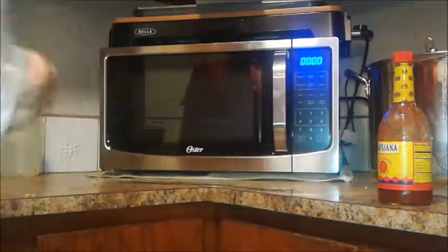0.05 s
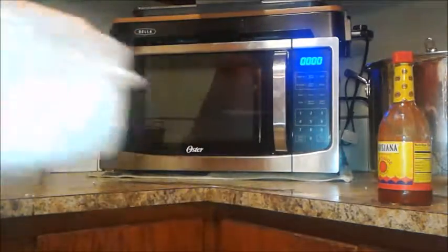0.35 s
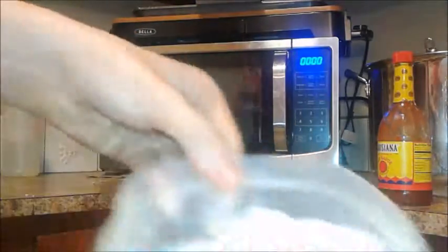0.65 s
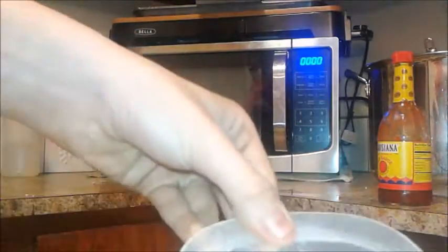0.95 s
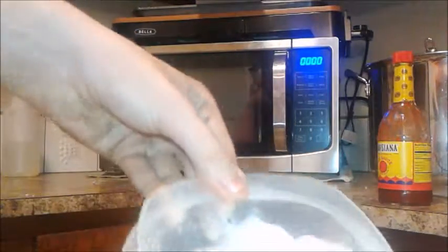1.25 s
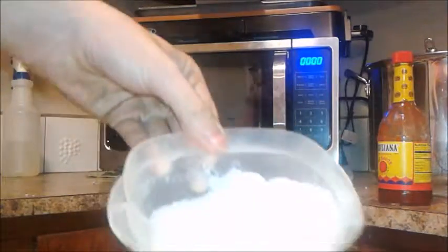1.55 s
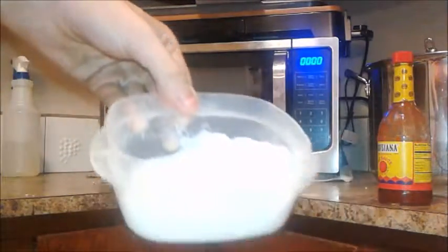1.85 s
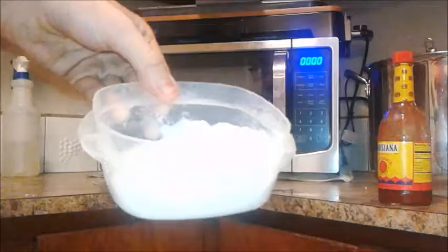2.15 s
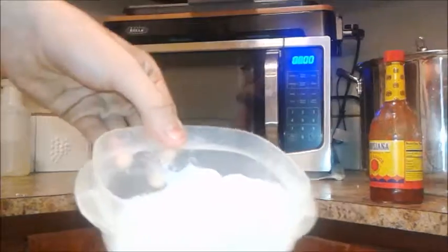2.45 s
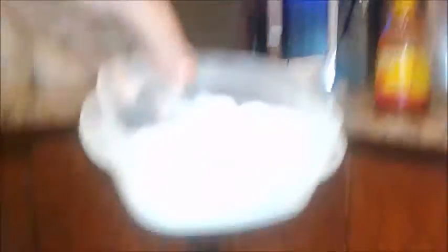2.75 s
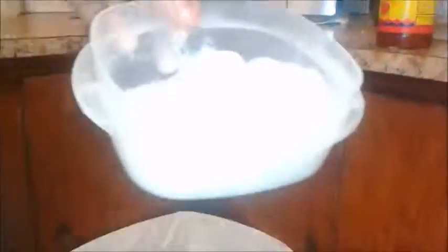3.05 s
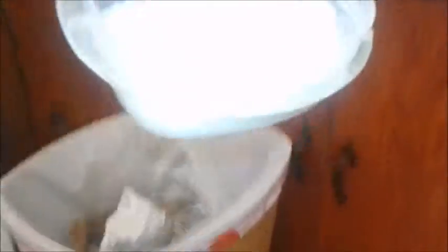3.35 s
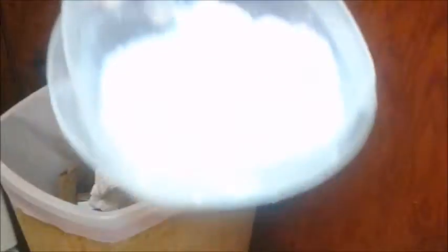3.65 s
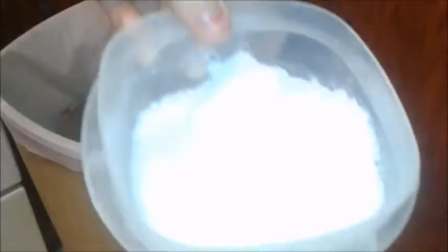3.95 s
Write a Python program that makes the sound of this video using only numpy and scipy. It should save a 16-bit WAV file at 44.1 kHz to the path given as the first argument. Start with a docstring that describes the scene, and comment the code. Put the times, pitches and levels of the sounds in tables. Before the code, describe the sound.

A plastic tub knocks sharply and irregularly over a bin in a quiet kitchen.

```python
"""Powder tub knocked over a bin

A plastic tub of powder is carried across a quiet kitchen and knocked about over a bin, up close.
Each knock is a sharp crack, a clack of the walls and a short hollow thump; the hard room answers
with a bright tail. An appliance hums underneath, and fingers tick, creak and rub on the plastic."""
import sys
import numpy as np
from scipy import signal
from scipy.fft import rfft, irfft
from scipy.io import wavfile

SR = 44100
rng = np.random.default_rng(int(sys.argv[2]) if len(sys.argv) > 2 else 0)


def waveform_to_disk(signal):
    """Save audio, clipped to [-1, 1], as 16-bit WAV at the path in sys.argv[1]."""
    frames = np.transpose(np.atleast_2d(signal))
    scaled = np.clip(frames, -1, 1) * 32767
    samples = np.round(scaled).astype(np.int16)
    wavfile.write(sys.argv[1], SR, samples)


N = 176400


def amp(db):
    """Decibels to gain."""
    return 10 ** (np.asarray(db) / 20)


def unit(x):
    """Scales to rms 1."""
    return x / np.sqrt(np.mean(x ** 2) + 1e-20)


def read(points, hz, column=1):
    """Reads one column of a curve on a log-frequency axis."""
    columns = np.transpose(points)
    return np.interp(np.log(hz + 1), np.log(columns[0] + 1), columns[column])


def fader(points):
    """Gain over time from a dB curve."""
    return amp(np.interp(np.arange(N) / SR, *np.transpose(points)))


def add(mix, start_s, sound):
    """Mixes a stereo sound in at its start time."""
    part = mix[:, max(round(start_s * SR), 0):][:, :sound.shape[1]]
    part += sound[:, :part.shape[1]]


def band(x, hz, width):
    """One resonance; width is a share of its frequency."""
    return signal.lfilter(*signal.iirpeak(hz, 1 / width, SR), x)


def flat_spectrum(x):
    """Spectrum of a burst with all frequencies made equally strong."""
    return np.exp(1j * np.angle(rfft(x)))


def stereo_eq(x, points, size=2048):
    """Minimum-phase EQ with one curve for the left and one for the right."""
    hz = abs(np.fft.fftfreq(size, 1 / SR))
    sides = []
    for column, side in enumerate(x, start=1):
        log_gain = np.log(amp(read(points, hz, column)))
        taps = np.fft.ifft(np.exp(np.conj(signal.hilbert(log_gain)))).real
        sides.append(signal.oaconvolve(side, taps[:size // 2])[:len(side)])
    return np.array(sides)


def noise(points):
    """Two unrelated channels of coloured noise at rms 1."""
    gain = amp(read(points, np.fft.rfftfreq(N, 1 / SR)))
    return unit(irfft(rfft(rng.standard_normal((2, N))) * gain, N))


def wander(rate_hz):
    """Random motion up to about the given rate."""
    lowpass = np.exp(-(np.fft.rfftfreq(N, 1 / SR) / rate_hz) ** 2)
    return unit(irfft(rfft(rng.standard_normal(N)) * lowpass, N))


def room_tone():
    """Soft kitchen air, centred in the low mids and wide elsewhere."""
    # colour of the air: f/Hz, relative level/dB
    air_colour = [(15, -69), (25, -33), (32, -43), (64, -21), (121, -4.5), (146, -10.5), (202, -8),
                  (237, -4.5), (354, -4), (383, -15), (415, -11.5), (573, -14.5), (1060, -17.5),
                  (1150, -17.5), (1240, -20), (3350, -29), (6900, -33), (13800, -30), (15000, -40)]
    # likeness of left and right: f/Hz, correlation
    correlation = [(30, 0.096), (250, 1), (700, 0.14), (2000, 0), (15000, 0.024)]
    left, unrelated = rfft(noise(air_colour))
    likeness = read(correlation, np.fft.rfftfreq(N, 1 / SR))
    right = likeness * left + np.sqrt(1 - likeness ** 2) * unrelated
    return irfft(np.array([left, right]), N)


def appliance_hum(waver=0.3, drift_rad=0.13):
    """An appliance hums, each partial wavering in level and phase."""
    # partials of the hum: f/Hz, level/dB
    partials = [(59.5, -78), (80, -73.5), (119.5, -66.5), (238, -70), (281, -72.5), (316, -76.5),
                (356, -80), (413, -79.5), (531, -81.5), (915, -86), (1122.5, -76), (1181, -86)]
    t, hum = np.arange(N) / SR, np.zeros((2, N))
    for hz, db in partials:
        gain = amp(db) * np.sqrt(2) * (1 + waver * wander(3.9))
        phase = drift_rad * wander(2.5) + rng.uniform(0, 1, (2, 1))
        hum += gain * np.sin(2 * np.pi * hz * t + phase)
    return hum


def kitchen():
    """The bed: air and hum ease down together."""
    # level of the air, whose shape the hum follows: t/s, level/dB
    bed_levels = [(0, -60), (1.2, -60.5), (2.0, -62.5), (2.5, -63), (3.0, -64), (4, -72)]
    fade = fader(bed_levels)
    return room_tone() * fade + appliance_hum() * unit(fade)


def reverb(x, size=22000, build_s=0.00067):
    """Dense reflections off hard surfaces, new for each place of the tub and longest in the treble."""
    # decay of the room: f/Hz, t60/s
    decay_times = [(100, 0.15), (400, 0.093), (1200, 0.31), (4500, 0.34), (8000, .32), (14000, 0.19)]
    t = np.arange(size) / SR
    hz, frame_s, spectra = signal.stft(rng.standard_normal((2, size)), SR, nperseg=256)
    decay = np.exp(-np.log(1000) * frame_s / read(decay_times, hz)[:, None])
    tail = signal.istft(spectra * decay, SR)[1][:, :size]
    tail *= 1 - np.exp(-(t / build_s) ** 2)
    tail /= np.linalg.norm(tail, axis=1, keepdims=True)
    return signal.fftconvolve(x[None], tail, axes=1)


def finger_ticks(size=1500, decay_s=0.00089, send_db=-7.5):
    """Fingers tick on the plastic: tiny resonant bursts with a touch of room."""
    # finger ticks: t/s, level before the resonance/dB, centre f/Hz
    ticks = [(0.07, -32.5, 7260), (.186, -35.5, 4970), (0.19, -38, 3700), (0.284, -45, 6900),
             (0.844, -36, 2690), (1.077, -43, 6200), (1.283, -36, 5600), (1.377, -42.5, 6550),
             (1.753, -42, 7000), (2.384, -36.5, 5100)]
    out = np.zeros((2, N))
    envelope = np.exp(-np.arange(size) / SR / decay_s)
    for start_s, db, hz in ticks:
        tick = amp(db) * band(envelope * rng.standard_normal((2, size)), hz, width=0.25)
        add(out, start_s, tick)
        add(out, start_s, amp(send_db) * reverb(tick[0]))
    return out


def grip_creaks():
    """The grip creaks in short swells of narrow, almost pitched noise."""
    # creaks: t/s, length/s, f/Hz, level/dB
    creaks = [(2.574, 0.039, 1610, -58.5), (2.591, 0.017, 1820, -47)]
    out = np.zeros((2, N))
    for start_s, length_s, hz, db in creaks:
        rasp = unit(band(rng.standard_normal((2, SR // 4)), hz, width=0.029))
        size = round(length_s * SR)
        add(out, start_s, amp(db) * rasp[:, :size] * np.hanning(size))
    return out


def rubbing(grain_db=0.5, grain_hz=250):
    """Fingers rub and powder slides: a faint, slightly grainy hiss."""
    # strength of the rubbing: t/s, level/dB
    rub_levels = [(0, -62.5), (.42, -70), (.48, -55), (.56, -70), (.9, -69), (1.1, -66), (1.7, -71.5),
                  (2.51, -73), (2.535, -50.5), (2.56, -57.5), (2.6, -54.5), (2.64, -60), (2.76, -60.5),
                  (3.0, -90), (4, -68.5)]
    # colour of the friction: f/Hz, relative level/dB
    rub_colour = [(100, 8), (1000, -17.5), (2500, -9.5), (4400, -3), (7000, -6.5), (10000, -13),
                  (15000, -21.5)]
    hiss = noise(rub_colour) * amp(grain_db * wander(grain_hz))
    return unit(hiss) * fader(rub_levels)


def handling():
    """Dull rumble of the tub moving in the hands."""
    # strength of the handling: t/s, level/dB
    rumble_levels = [(0, -76), (2.51, -69), (2.54, -51.5), (2.61, -44.5), (2.65, -57.5), (2.78, -52),
                     (2.88, -46), (2.98, -59), (3.3, -59.5), (4, -62.5)]
    # colour of the rumble: f/Hz, relative level/dB
    rumble_colour = [(20, -33), (75, 1), (130, -5.5), (280, -1.5), (450, -13), (900, -15), (2000, -25),
                     (8000, -60)]
    return noise(rumble_colour) * fader(rumble_levels)


def ring(modes, t, rise_s, tuning):
    """Modes swell briefly and die away, each with its own stereo balance; tuning scales their pitch."""
    out = np.zeros((2, len(t)))
    for hz, t60, left_db, right_db in modes:
        envelope = (1 - np.exp(-t / rise_s)) ** 2 * np.exp(-np.log(1000) * t / t60)
        envelope /= envelope.max()
        out += amp([[left_db], [right_db]]) * envelope * np.sin(2 * np.pi * hz * tuning * t)
    return out


def thump(t, pitch_hz, nominal_hz=320, lag_s=0.00046):
    """The hollow body thumps, reaching the right microphone a little later."""
    # body modes at nominal pitch: f/Hz, t60/s, left level/dB, right level/dB
    body_modes = [(185, 0.0098, -30, -20.5), (335, 0.016, -13, 1), (412, 0.01, -6.5, -33),
                  (525, 0.015, -16, -20.5)]
    hollow = ring(body_modes, t, rise_s=0.0045, tuning=pitch_hz / nominal_hz)
    hollow[1] = np.interp(t - lag_s, t, hollow[1])
    return hollow


def wall_clack(t, crack_over_clack_db, detune=0.05):
    """The walls clack at a slightly new pitch each time; a soft blow rings the high modes less."""
    # wall modes: f/Hz, t60/s, left level/dB, right level/dB
    wall_modes = [(762, 0.026, -34, -6.5), (888, 0.014, -7.5, -17.5), (1065, 0.033, -21, -27),
                  (1230, 0.025, -48, -10.5), (1543, 0.015, -16.5, -9), (1833, 0.015, -11.5, -35),
                  (2635, 0.0087, -14.5, -44)]
    tilt_db_per_octave = 0.65 * min(crack_over_clack_db, 0)
    lowest_hz = wall_modes[0][0]
    tilted = [(hz, t60, *(np.array(sides_db) + tilt_db_per_octave * np.log2(hz / lowest_hz)))
              for hz, t60, *sides_db in wall_modes]
    return ring(tilted, t, rise_s=0.00057, tuning=1 + detune * rng.standard_normal())


def crack(t, tilt_db_per_octave, pivot_hz=4350, peak_s=0.00059, ring_db=-11, ring_s=0.0069):
    """The plastic cracks: a stereo snap of noise, plus a clean mono click to excite the room."""
    size, rise = len(t), t / peak_s
    snap = rise ** 2 * np.exp(2 * (1 - rise))
    snap += amp(ring_db) * np.minimum(rise, 1) * np.exp(-t / ring_s)
    octaves = np.log2(np.maximum(np.fft.rfftfreq(size, 1 / SR) / pivot_hz, 0.5))
    tilt = amp(tilt_db_per_octave * octaves)
    # flattening twice keeps the colour even from knock to knock
    burst = irfft(flat_spectrum(snap * rng.standard_normal((2, size))), size)
    even = flat_spectrum(snap * burst)
    grit = snap * irfft(even * tilt, size)
    grit /= np.linalg.norm(snap * irfft(even, size), axis=1, keepdims=True)
    click = np.roll(irfft(tilt, size), size // 100)
    strength = np.linalg.norm(snap)
    return strength * grit, strength * click


def knocks(size=3000, body_send_db=1.5, bass_cut_hz=168):
    """Each blow thumps the body, rings the walls and cracks; the room answers."""
    # blows, levels ahead of the EQ: t/s, thump level/dB, clack level/dB, crack level/dB,
    # thump pitch/Hz, crack tilt/(dB per octave), room send/dB
    blows = [(2.532, -47, -34, -37.5, 316, -5, 7.5), (2.540, -33.5, -61, -37.5, 377, -5, -5),
             (2.5992, -28.5, -42.5, -39.5, 284, -7.5, -7), (2.672, -34, -58, -54, 288, -3, -7),
             (2.692, -36, -41, -50, 306, -1.5, 4), (2.7499, -36.5, -44, -41, 296.3, -3.5, -12),
             (2.7786, -12.5, -7.5, -10, 304, -0.5, -1), (2.787, -21.5, -29, -37, 307, -8, -1),
             (2.8333, -17, -13.5, -13, 315, -3, -27), (2.8631, -5, -6.5, -5, 322, 1, 3.5),
             (2.8885, -21, -40, -31, 286, -6, 4), (2.9327, -20, -32, -45, 284, -13, 3.5),
             (3.0393, -25, -30, -27, 344, -5.5, -8.5), (3.051, -39, -33.5, -53, 320, 3, 9),
             (3.089, -26.5, -31, -36, 302, -7, 20), (3.0960, -11.5, -11, -9.5, 310, 0.5, -3.5),
             (3.259, -25.5, -27, -20.5, 327, -3.5, 2.5), (3.2736, -13, -9, -10, 327, -0.5, -4),
             (3.3992, -24, -27.5, -47, 315, -3, 0), (3.4331, -27, -28, -32.5, 320, -8.5, -2),
             (3.445, -15, -9.5, -14.5, 311, -4, -4.5), (3.4550, -17.5, -15.5, -27, 334, -13, -9.5),
             (3.5454, -31.5, -38, -59, 303, -2, -1), (3.5572, -20, -17.5, -31.5, 310, -11.5, -3),
             (3.6051, -30, -32, -29.5, 326, -6, -2.5), (3.6225, -38, -36, -46, 320, -1, -3),
             (3.6493, -25, -25, -29.5, 287, -0.5, 12), (3.6570, -15.5, -16, -12.5, 310, -5.5, -7),
             (3.82, -41, -52, -57, 297, 2.5, 13), (3.8563, -26, -24.5, -25, 335, -4.5, -3.5),
             (3.9405, -21, -26, -26.5, 307, -3, 8.5), (3.9461, -12, -11.5, -9, 305.6, 0, 0.5)]
    # colour of the crack: f/Hz, left gain/dB, right gain/dB
    crack_eq = [(100, -8, 6), (1300, 3, -15), (2780, -17.5, -6.5), (3440, -6, 0.5), (4000, 7.5, 0),
                (4810, -2, -0.5), (6260, 0.5, 8), (8000, -13.5, -2), (9400, -2, -2.5), (10200, -46.5, -9),
                (13100, -7, -3.5), (16000, -26, -35.5)]
    # colour of the reflections: f/Hz, left gain/dB, right gain/dB
    room_eq = [(100, -7, -14.5), (318, -25, -17), (705, -20.5, -18.5), (1060, -18, -15), (1560, -24, -22.5),
               (2070, -14, -16), (2660, -10.5, -10), (3330, -3.5, -7), (4600, 1, -5), (6240, -10, -3),
               (8000, -16, -9), (11200, -22, -16.5), (15200, -40, -36)]
    t = np.arange(size) / SR
    bodies, cracks, tails = np.zeros((3, 2, N))
    for start_s, thump_db, clack_db, crack_db, pitch_hz, tilt, send_db in blows:
        body = amp(thump_db) * thump(t, pitch_hz)
        body += amp(clack_db) * wall_clack(t, crack_db - clack_db)
        grit, click = crack(t, tilt)
        send = amp(body_send_db) * body.sum(0) + amp(crack_db) * click
        add(bodies, start_s, body)
        add(cracks, start_s, amp(crack_db) * grit)
        add(tails, start_s, amp(send_db) * reverb(send))
    mix = bodies + stereo_eq(cracks, crack_eq) + stereo_eq(tails, room_eq)
    # a high-pass takes the deepest bass out of the knocks
    return signal.sosfilt(signal.butter(3, bass_cut_hz, "high", fs=SR, output="sos"), mix)


def scene():
    """Knocks up front, small sounds of the grip behind them, the kitchen underneath."""
    return knocks() + finger_ticks() + grip_creaks() + rubbing() + handling() + kitchen()


def record(dry):
    """The loudest peaks clip, then a steep low-pass takes off the very top."""
    cutoff_hz = 15200
    taps = signal.firwin(255, cutoff_hz, window=("kaiser", 8), fs=SR)
    return signal.oaconvolve(np.clip(dry, -1, 1), taps[None], "same")


dry = scene()
out = record(dry)
waveform_to_disk(out)
```